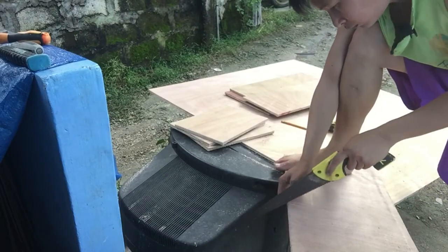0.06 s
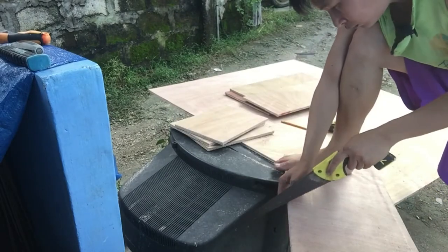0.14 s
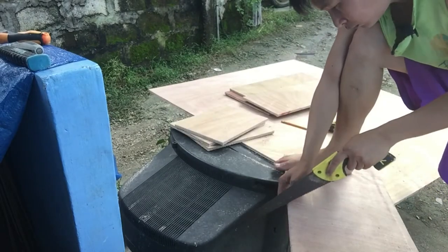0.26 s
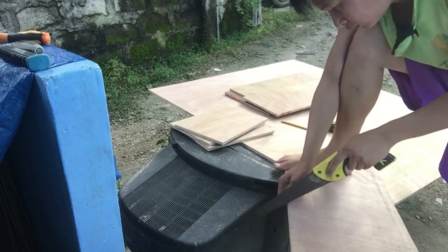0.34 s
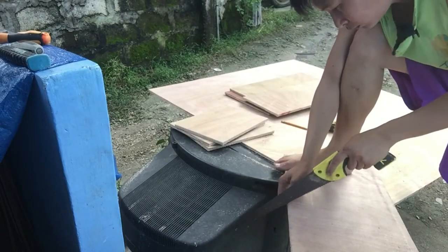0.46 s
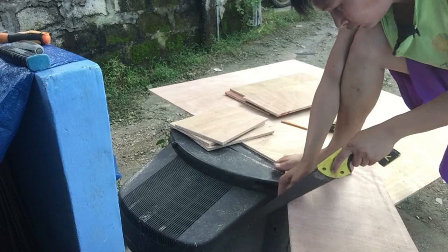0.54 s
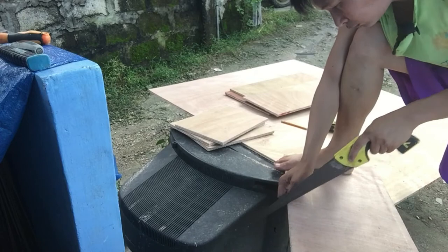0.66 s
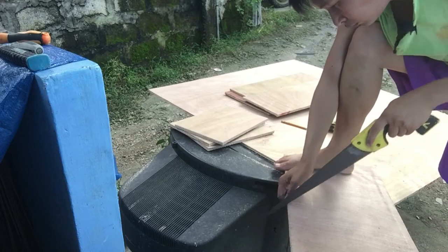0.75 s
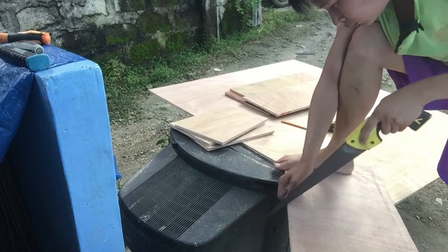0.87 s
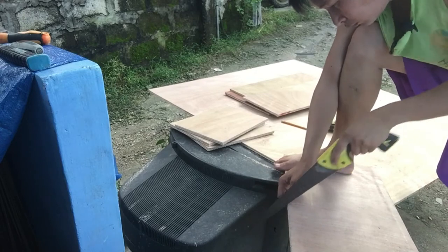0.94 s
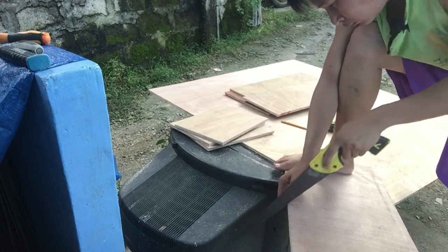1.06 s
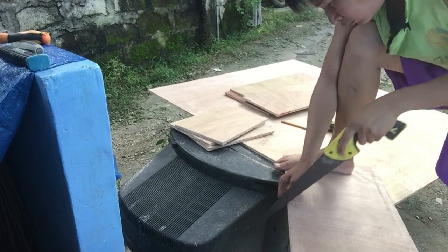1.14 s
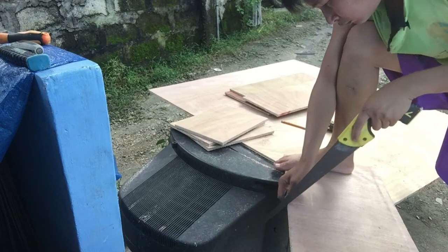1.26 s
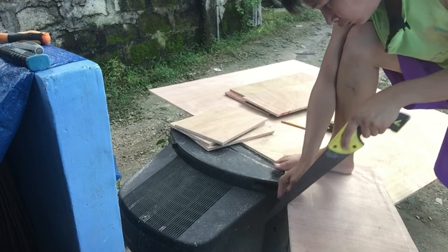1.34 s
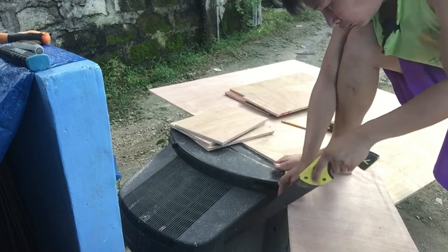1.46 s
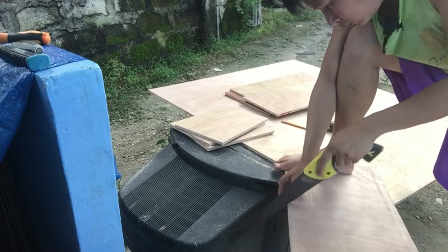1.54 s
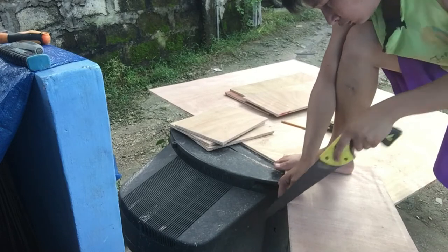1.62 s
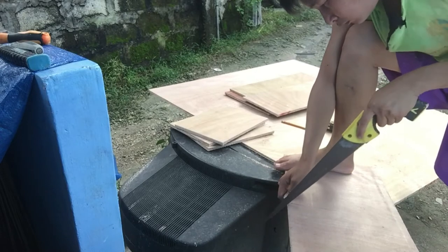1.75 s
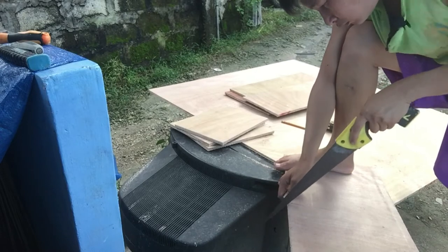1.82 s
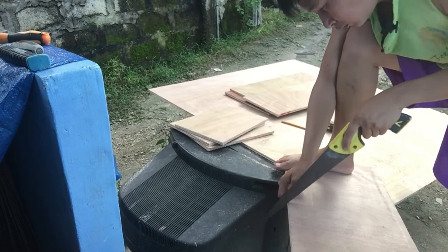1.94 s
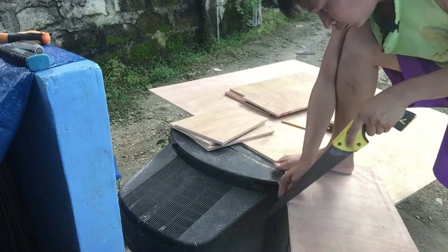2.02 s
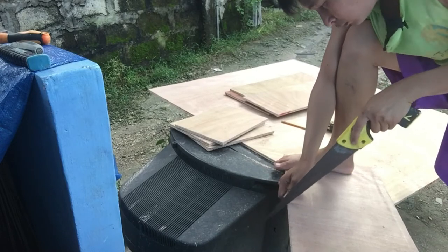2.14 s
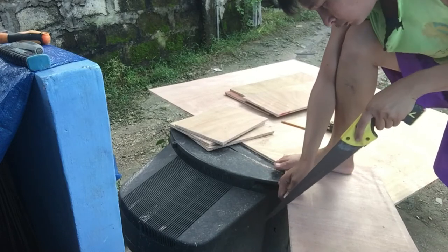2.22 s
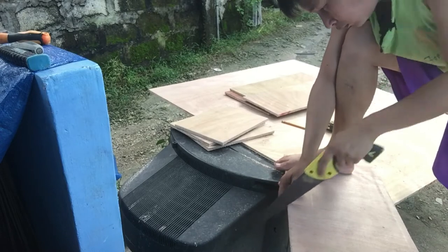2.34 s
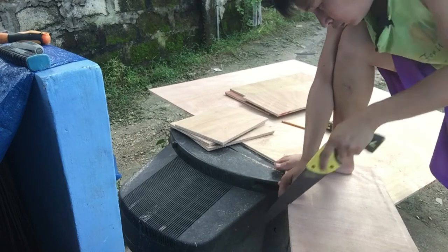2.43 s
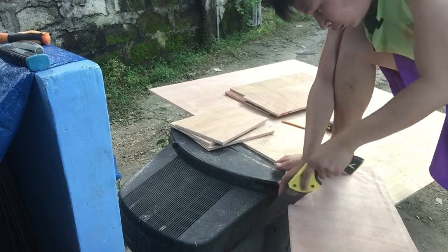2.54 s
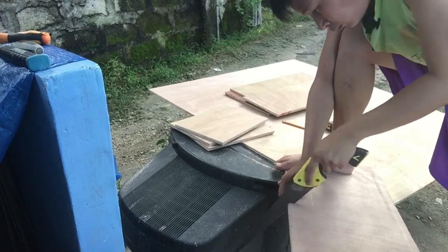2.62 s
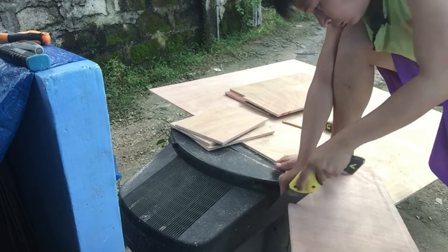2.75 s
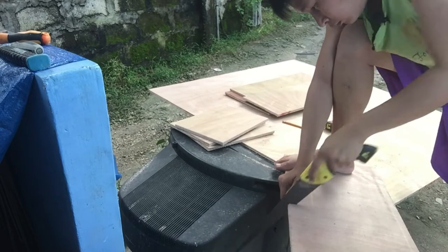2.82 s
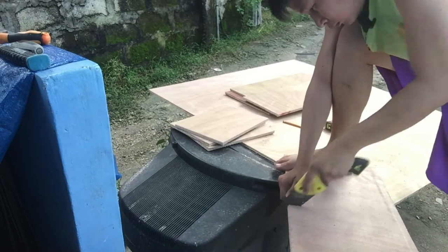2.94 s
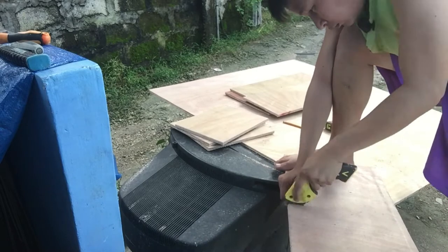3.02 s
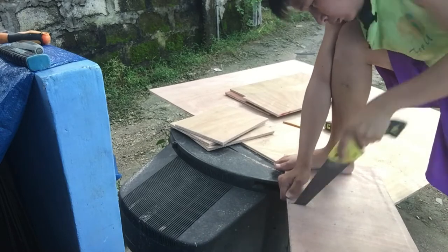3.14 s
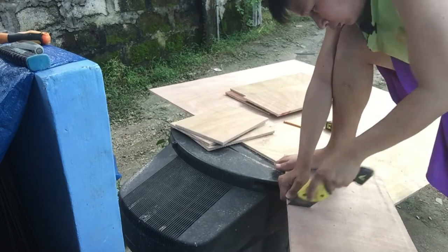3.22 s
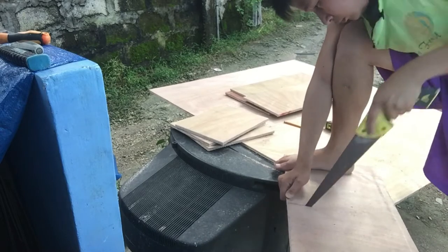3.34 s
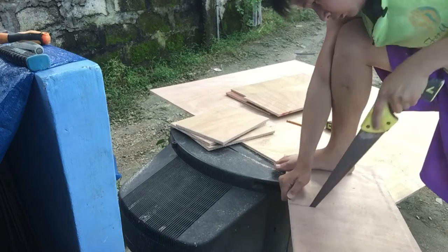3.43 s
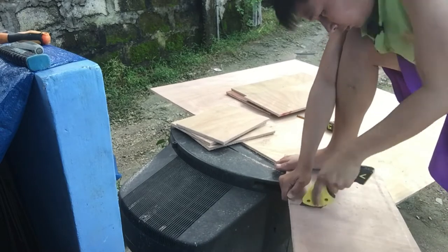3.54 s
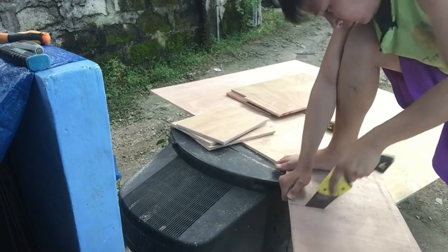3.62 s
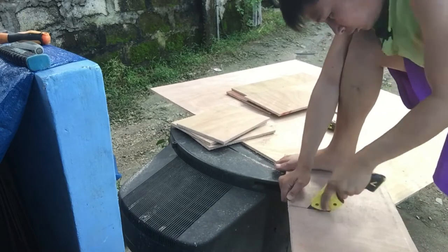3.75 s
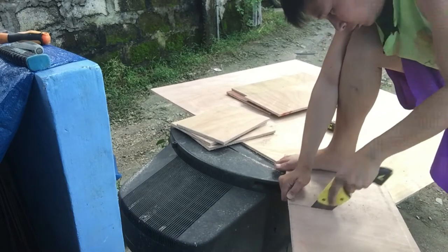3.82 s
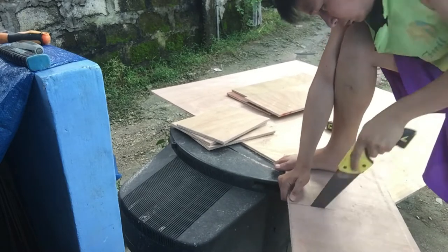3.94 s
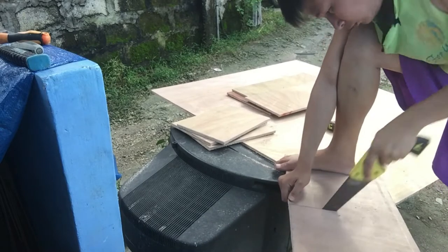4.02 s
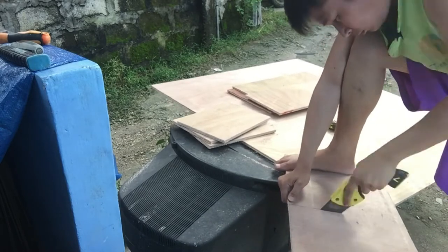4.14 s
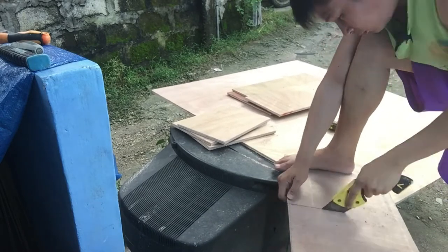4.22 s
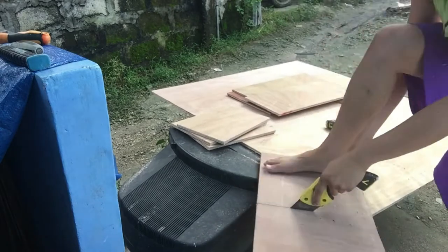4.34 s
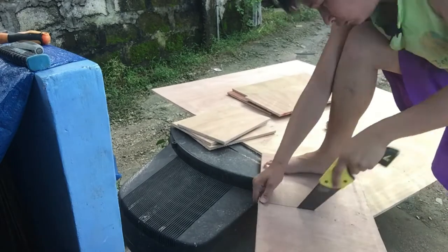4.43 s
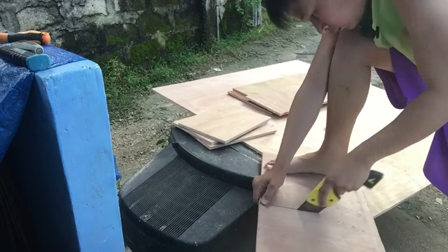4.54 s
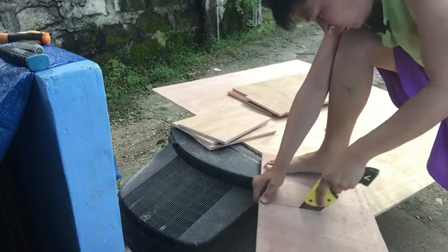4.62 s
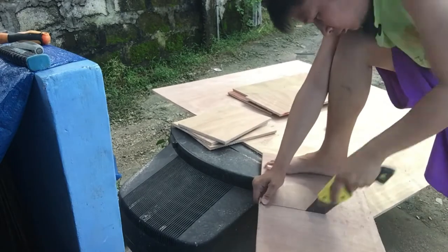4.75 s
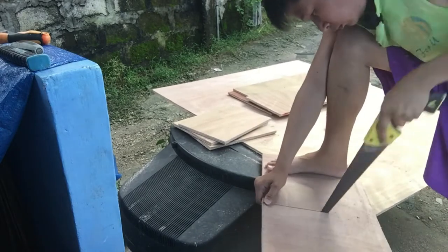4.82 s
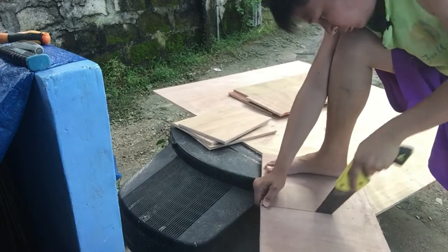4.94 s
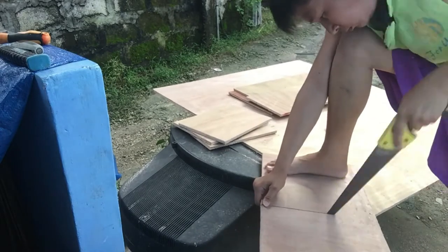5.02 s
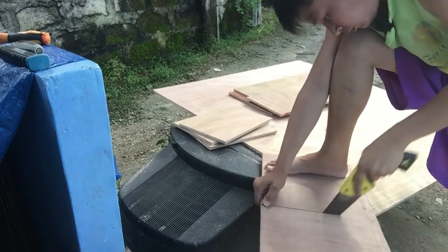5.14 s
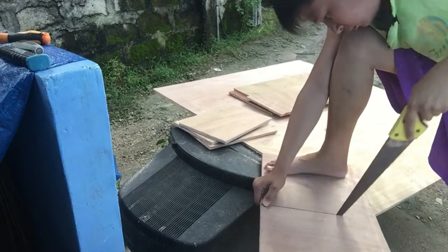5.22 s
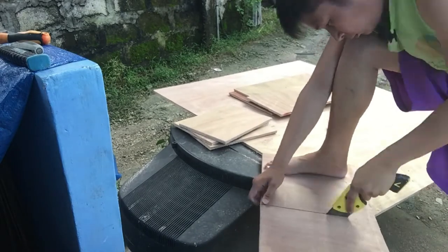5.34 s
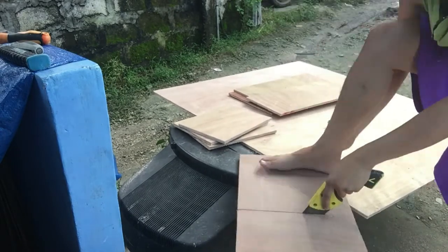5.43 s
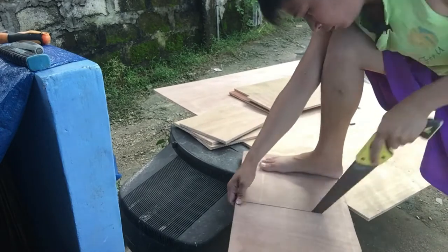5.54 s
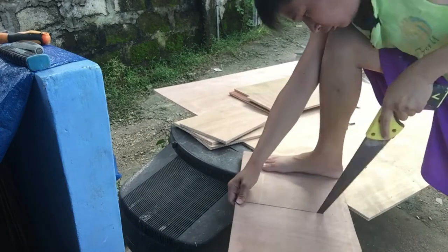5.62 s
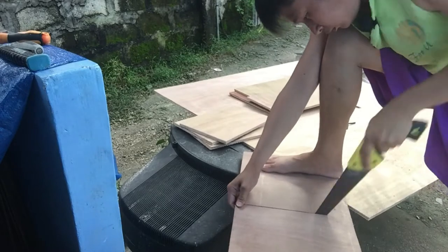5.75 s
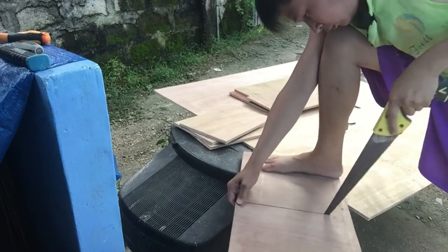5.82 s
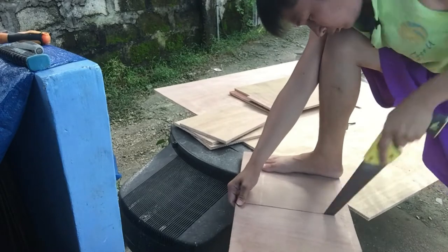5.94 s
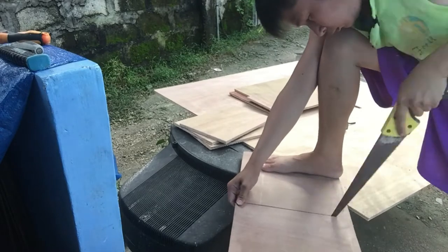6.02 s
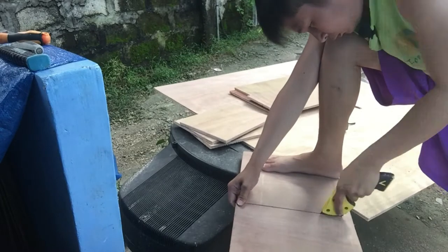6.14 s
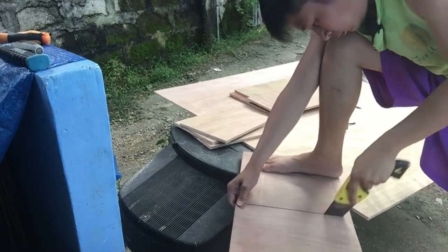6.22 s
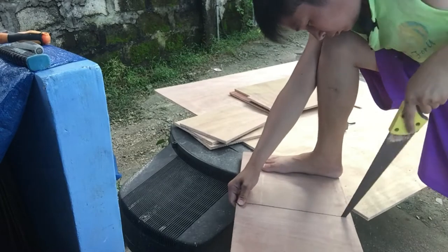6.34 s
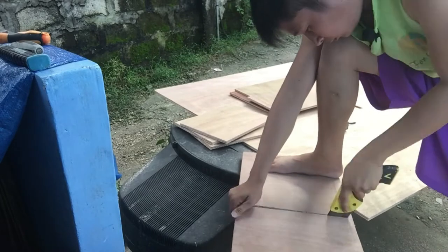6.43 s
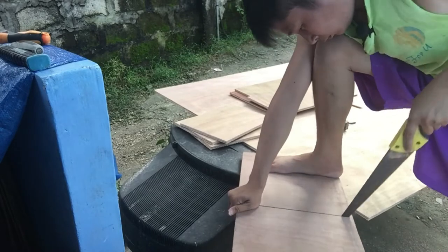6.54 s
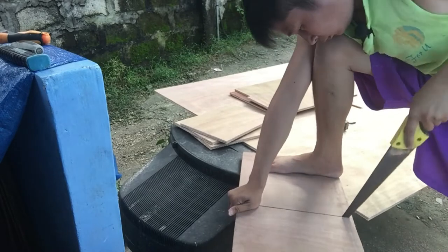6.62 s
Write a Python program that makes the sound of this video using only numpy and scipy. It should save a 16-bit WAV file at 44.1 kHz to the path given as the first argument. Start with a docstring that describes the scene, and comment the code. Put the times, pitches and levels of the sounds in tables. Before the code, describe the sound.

In a quiet yard, a blade lightly brushes thin plywood for two seconds, giving low hollow drones, soft rasps and dull bumps. Then unnaturally fast hand sawing breaks in, about fourteen harsh strokes a second, with early knocks from the loose panel. Short gaps interrupt it near the middle and end. Close microphone, about a metre away, with dry sound and only a faint dull echo.

```python
"""Slow, light saw strokes and dull bumps come first, making a thin plywood panel drone in a quiet yard.
Then comes sped-up playback of a hand saw, about fourteen strokes a second with short pauses, a metre away.
Each stroke is a grainy pull and a loud push: noise grains and tooth pulses ring through blade and panel,
whose resonances shift as the cut lengthens. Pushes may end in a knock, made of damped panel modes.
Around the saw lie squeaks, ticks, a flutter of the panel, low rumble, faint air noise and a dull echo."""
import sys
import numpy as np
from scipy import signal
from scipy.fft import rfft, irfft
from scipy.io import wavfile
from scipy.ndimage import uniform_filter1d, map_coordinates

SR = 44100
rng = np.random.default_rng(int(sys.argv[2]) if len(sys.argv) > 2 else 0)


def transcribe(signal):
    """Save signal, clipped to [-1, 1], as a 16-bit WAV file at the path in sys.argv[1]."""
    frames = np.atleast_2d(signal).T
    limited = np.clip(frames, -1, 1)
    pcm = np.round(limited * 32767).astype(np.int16)
    wavfile.write(sys.argv[1], SR, pcm)


N = 294491
TIME = np.arange(N) / SR  # s
TAPS = 4096  # length of the impulse responses, samples
FREQ = np.maximum(np.arange(TAPS // 2 + 1) * SR / TAPS, 1)  # Hz
TOP_HZ = 15850  # upper limit of the recorder

# Tone of the yard air. Each row: frequency in Hz, relative level in dB.
YARD_TONE = [(15, -44), (25, -10), (81, -21), (128, -12), (1180, -24.5), (2500, -37), (12400, -41.5),
             (15000, -42)]
# Loudness of the yard air, around which it wavers. Each row: time in seconds, level in dB.
YARD_LOUDNESS = [(0, -48.5), (.22, -57.5), (.4, -59.5), (2.3, -56.5), (6.68, -46)]
# Swells of low rumble, which waver. Each row: middle in seconds, length in seconds, level in dB.
RUMBLE_SWELLS = [(.84, 0.17, -34.5), (1.32, 0.074, -31.5), (1.8, 0.74, -39), (2.275, 0.039, -26.5),
                 (6.61, 0.044, -31)]
# Dull bumps of the panel under hand and foot. Each row: time in seconds, peak in dB before a common trim.
PANEL_BUMPS = [(0.647, -22), (0.725, -17.5), (1.145, -20), (1.192, -18), (1.663, -14), (1.688, -13.5),
               (1.87, -14.5), (2.123, -18), (2.148, -27), (3.954, -16), (4.423, -23), (4.83, -21.5),
               (4.918, -19), (5.519, -18.5), (6.585, -16), (6.603, -15.5), (6.625, -24)]
# Small sharp ticks. Each row: time in seconds, peak in dB before a common trim.
SHARP_TICKS = [(2.0761, -27.5), (4.2964, -22.5), (4.4383, -18), (5.5286, -19), (5.5486, -22), (6.572, -8)]
# Bending modes of the panel. Each row: frequency in Hz, width in Hz, relative level in dB.
BENDING_MODES = [(138, 69, -7.5), (223, 50, 3.5), (290, 16, 4), (418, 36, -2), (526, 90, -40)]
# Slow, light strokes and brushes of the blade. Each row: middle in seconds, length in seconds,
# panel drone in dB and rasp in dB, both before a common trim.
LIGHT_STROKES = [(0.713, 0.25, -33, -43.5), (1.006, 0.14, -21.5, -34.5), (1.223, 0.17, -32.5, -46),
                 (1.478, 0.15, -23, -32.5), (1.703, 0.13, -28, -39.5), (1.899, 0.12, -27, -40.5),
                 (2.155, 0.71, -44.5, -58.5), (3.966, 0.024, -35, -32), (4.34, 0.049, -71, -49),
                 (5.46, 0.018, -67, -36), (5.525, 0.036, -63, -44), (6.608, 0.08, -29, -43.5)]
# Tone of the light rasp. Each row: frequency in Hz, relative level in dB.
RASP_TONE = [(620, 5.5), (820, 9), (950, 6), (1080, -1), (1370, 3), (1560, -6.5), (2050, 0.5), (2800, -6),
             (4000, -3), (5000, -7), (7000, -10.5), (10000, -14.5), (15000, -32)]
# Thin squeaks of the blade in the kerf. Each row: start in seconds, length in seconds,
# centre pitch in Hz, peak in dB.
BLADE_SQUEAKS = [(5.652, 0.024, 8700, -31), (5.686, 0.047, 8400, -32), (5.754, 0.061, 13800, -31)]
# Looseness of the panel, greatest while the cut is near its free edge. Each row: time in seconds,
# level of its knocks in dB before stroke strength and trim.
PANEL_LOOSENESS = [(2.48, -24), (2.58, -9), (2.66, -10), (2.77, 4), (3.12, 0), (3.19, -11), (3.57, -12),
                   (4.24, -17), (4.58, -31), (6.55, -26)]
# The blade catches on a pull and shakes the panel. Each row: middle in seconds, length in seconds, level in dB.
BLADE_CATCHES = [(2.421, .008, -24), (2.745, 0.014, -25.5), (3.447, 0.034, -24.5), (3.545, 0.024, -25),
                 (4.83, 0.031, -35.5)]
# Modes of the panel jolted at the end of a push. Each row: frequency in Hz before a random detuning,
# width in Hz, relative level in dB.
JOLT_MODES = [(152.5, 120, -4.5), (400, 190, 0), (517, 155, -1.5), (1000, 670, 1), (1450, 334, -6)]
# Strokes of the sped-up sawing. Each row: peak of the push in seconds, strength in dB.
SPED_UP_STROKES = [(2.379, -6.5), (2.439, -4), (2.505, -3.5), (2.578, -2.5), (2.652, -2), (2.765, -0.5),
                   (2.838, 0), (2.911, -0.5), (2.982, 1), (3.0516, 2), (3.1215, 2.5), (3.190, -1),
                   (3.260, -0.5), (3.3296, -1), (3.398, .5), (3.496, -1), (3.570, 2), (3.641, -0.5),
                   (3.710, 0), (3.777, -1), (3.845, -0.5), (3.915, 0), (4.038, .5), (4.108, 2),
                   (4.174, 1.5), (4.2437, 1), (4.512, -1.5), (4.581, 0.5), (4.650, 1.5), (4.7178, 1),
                   (4.786, 0.5), (4.878, 1), (4.961, .5), (5.029, -0.5), (5.097, -.5), (5.164, 0),
                   (5.231, 0), (5.299, -2), (5.365, -.5), (5.624, -4.5), (5.691, -3), (5.757, -1.5),
                   (5.822, .5), (5.889, 2), (5.956, 1), (6.023, -0.5), (6.090, -0.5), (6.173, -0.5),
                   (6.247, -.5), (6.324, 0), (6.413, -1), (6.549, -3)]
# Progress of the cut. Each row: time in seconds, stage (0 early, 1 midway, 2 late).
CUT_PROGRESS = [(3.1, 0.035), (3.6, 0.33), (3.8, 0.76), (4.1, 1), (5.35, 1.05), (5.65, 1.58), (5.9, 1.94)]
# How loudly the teeth cut, one row for each stage. Each row: scrape in dB, bite in dB.
STAGE_LEVELS = [(-16.5, -19.5), (-19, -13.5), (-16, -19)]
# Outline of the tone of blade and panel at each stage. Each row: frequency in Hz, relative level in dB.
EARLY_OUTLINE = [(300, -12), (700, -7), (950, -5.5), (1400, -7.5), (1900, 4), (2300, -2.2), (2900, -11.5),
                 (3500, -6), (4200, -19), (5000, -17), (5700, -15), (6800, -19), (9000, -15),
                 (15000, -15.5)]
MIDWAY_OUTLINE = [(300, -27), (700, -14.5), (950, -4.5), (1400, -7.5), (1900, -16), (2300, -10.5),
                  (2900, -8), (3500, -0.2), (4200, -0.5), (5000, -4), (5700, -13), (6800, -13), (9000, -15),
                  (15000, -17.5)]
LATE_OUTLINE = [(300, -20.5), (700, -20), (950, -4), (1400, 2), (1900, -2.5), (2300, -7), (2900, -10.5),
                (3500, -5.5), (4200, -9.5), (5000, -7), (5700, -16.5), (6800, -15), (9000, -15.5),
                (15000, -12)]
# Resonances standing out of each outline. Each row: frequency in Hz, width in Hz, lift in dB.
EARLY_RESONANCES = [(1870, 160, 3), (2420, 260, 6), (3020, 450, 9.5), (3500, 340, 3), (4520, 150, 9.5),
                    (4570, 220, 7), (6193, 140, 15), (6770, 330, 8.5), (7380, 160, 12.5)]
MIDWAY_RESONANCES = [(1409, 131, 6.9), (1920, 110, 3.1), (2416, 386, 15.4), (2950, 270, 1),
                     (4220, 600, 2.3), (4898, 310, 1.7), (5610, 230, 4.2), (5900, 220, 3.8),
                     (6970, 440, 9.7)]
LATE_RESONANCES = [(970, 160, 1.47), (1259, 83.5, 3.6), (1924, 330, 6.2), (2322, 274, 7.9),
                   (3138, 200, 2.5), (4200, 140, 1.4), (4391, 192, 4), (6400, 390, 11.7), (8000, 55.4, 5.5)]

# All stroke times below are as heard, sped up.
# On a push the teeth engage this long before its peak, and take this long to grip.
PUSH_S, GRIP_S = 0.0205, 0.0044
# A pull starts this long after a peak, and at most this long before the next; then the first pull's start.
TURN_S, LONGEST_PULL_S, FIRST_PULL_S = 0.011, 0.068, 2.338
# The steady beat of the strokes; one that is LATE_S or more behind it starts fully from rest.
BEAT_S, LATE_S = 0.07, 0.03
# From rest, the push is longer (share), the pull softer and the knock softer (dB).
REST_STRETCH, REST_PULL_DB, REST_KNOCK_DB = 0.12, -6, -7


def undb(db):
    """Decibels to gain."""
    return 10 ** (np.asarray(db) / 20)


def rms(x):
    """Root mean square."""
    return np.sqrt(np.mean(x ** 2))


def ramp(x):
    """Clip to 0..1, so that a rising value climbs to 1 and stays there."""
    return np.clip(x, 0, 1)


def curve(rows):
    """Second column of a table over time, joined by straight lines."""
    times, values = np.transpose(rows)
    return np.interp(TIME, times, values)


def walk(rate):
    """Random wander with this many corner points a second, spread near 1."""
    corners = rng.standard_normal(N // 10)
    return 1.2 * np.interp(TIME * rate, np.arange(N // 10), corners)


def swells(rows, fade_db):
    """Level of gestures (middle s, length s, dB) that swell and fade; each is fade_db down at its ends."""
    level = np.zeros(N)
    for middle, length, db in rows:
        near = np.abs(TIME - middle) < 2 * length
        position = 2 * (TIME[near] - middle) / length
        level[near] += undb(db - fade_db * position ** 2)
    return level


def colour(points, peaks=()):
    """Gain over frequency: an outline (Hz, dB) with resonances (Hz, width Hz, dB) standing out of it."""
    hz, db = np.transpose(points)
    outline = np.interp(np.log(FREQ), np.log(hz), db)
    lifts = sum(lift / (1 + (2 * (FREQ - f) / width) ** 2) for f, width, lift in peaks)
    return undb(outline + lifts)


def modes(rows):
    """Gain over frequency of a set of damped modes (Hz, width Hz, dB), summed in power."""
    power = 0
    for f, width, db in rows:
        detuning = (FREQ ** 2 - f ** 2) / (FREQ * width)
        power = power + undb(2 * db) / (1 + detuning ** 2)
    return np.sqrt(power)


def below(hz, order=4):
    """Gain of a low-pass."""
    return 1 / np.sqrt(1 + (FREQ / hz) ** (2 * order))


def above(hz, order=4):
    """Gain of a high-pass."""
    return 1 / np.sqrt(1 + (hz / FREQ) ** (2 * order))


def response(gain):
    """Causal, minimum-phase impulse response with this gain, made by folding its cepstrum."""
    cepstrum = irfft(np.log(gain + gain.max() * 1e-5))
    cepstrum[1:TAPS // 2] *= 2
    cepstrum[TAPS // 2 + 1:] = 0
    return irfft(np.exp(rfft(cepstrum)))


def ring(force, gain):
    """Play a force through a body; white noise keeps its level."""
    return signal.oaconvolve(force, response(gain / rms(gain)))[:N]


def decaying_noise(t, t60):
    """Noise of unit energy that falls by 60 dB in t60 seconds."""
    tail = rng.standard_normal(len(t)) * undb(-60 * t / t60)
    return tail / np.linalg.norm(tail)


def ring_on(sound, t60=0.042, ring_db=-11):
    """The crowd of weak modes in blade and panel rings on as a short noise tail (t60 in s)."""
    tail = decaying_noise(TIME[:2 * TAPS], t60)
    ringing = signal.oaconvolve(sound, tail)[:N]
    return (sound + undb(ring_db) * ringing) / np.hypot(1, undb(ring_db))


def add(out, s, sound, db):
    """Mix in a short sound at time s with the given peak level."""
    start = int(s * SR)
    part = out[start:start + len(sound)]
    scaled = undb(db) * sound / np.abs(sound).max()
    part += scaled[:len(part)]


def grains(rate, spread_db, smooth):
    """Fibres snap at random (rate a second), in uneven sizes, over smooth friction noise; rms 1."""
    happens = rng.random(N) < rate / SR
    size = undb(spread_db * np.clip(rng.standard_normal(N), -2, 2))
    snaps = happens * rng.choice([-1, 1], N) * size
    force = snaps / rms(snaps) + smooth * rng.standard_normal(N)
    return force / rms(force)


def yard(waver_db=4):
    """Faint outdoor noise, with an uneven low rumble before and after the sped-up strokes."""
    air = ring(rng.standard_normal(N), colour(YARD_TONE))
    air = air * undb(curve(YARD_LOUDNESS) + walk(26))
    rumble_tone = colour([(12, 1), (30, 2.5), (80, 3.5), (140, -5.0), (400, -20), (1500, -83)])
    rumble = ring(rng.standard_normal(N), rumble_tone)
    swell = swells(RUMBLE_SWELLS, fade_db=5.5) * undb(waver_db * np.tanh(walk(22)))
    return air + swell * rumble


def walls(sound, t60=0.26, echo_db=-26):
    """The walls of the yard return a faint, dull echo: low-passed, decaying noise (t60 in s)."""
    tail = decaying_noise(TIME[:SR // 3], t60)
    echo = signal.oaconvolve(sound, tail)[:N]
    return sound + undb(echo_db) * ring(echo, below(9600, order=1))


def small_hits(bump_trim_db=-1, tick_trim_db=-2):
    """Soft bumps ring the panel's low modes; ticks are dry clicks with a falling treble."""
    out = np.zeros(N)
    # a bump also rocks the whole panel on its support
    panel = modes(list(BENDING_MODES) + [(130, 40, 0.5)])
    bump = response(panel * below(496, order=3))
    for s, db in PANEL_BUMPS:
        add(out, s + 0.0019, bump, db + bump_trim_db)
    tick = response(colour([(200, 7), (1700, 1.0), (14000, -23.0)]))
    for s, db in SHARP_TICKS:
        add(out, s + 0.00126, tick, db + tick_trim_db)
    return out


def rubbing(drone_trim_db=-1, rasp_trim_db=0):
    """Strokes with little pressure swell and fade: the panel drones in its bending modes under a soft rasp."""
    s, length, drone_db, rasp_db = np.transpose(LIGHT_STROKES)
    drone_level = swells(zip(s, length, drone_db + drone_trim_db), fade_db=8)
    rasp_level = swells(zip(s, length, rasp_db + rasp_trim_db), fade_db=9.5)
    friction = grains(rate=2500, spread_db=0.5, smooth=0.89) * undb(2.85 * walk(150))
    bending = modes(BENDING_MODES) * below(456, order=3) * above(117, order=2)
    drone = ring(friction * drone_level, bending)
    scratches = grains(rate=1400, spread_db=6.5, smooth=0.82) * undb(2 * walk(120))
    rasp = ring(scratches * rasp_level, colour(RASP_TONE) * above(510, order=2))
    return drone + ring_on(rasp, t60=0.27, ring_db=-4.5)


def squeaks():
    """The blade sings briefly where the kerf pinches it: sine tones with a trembling pitch."""
    out = np.zeros(N)
    for s, length, hz, db in BLADE_SQUEAKS:
        count = int(length * SR)
        pitch = hz * (1 + 0.011 * walk(920)[:count])
        tone = np.sin(2 * np.pi * np.cumsum(pitch) / SR)
        add(out, s, np.hanning(count) * tone, db)
    return out


def fluttering(moving, flutter_db=-35, follows=0.21):
    """Sparse grains shake the panel while the blade moves: more when it is loose, or when the blade catches."""
    shake = undb(flutter_db + follows * curve(PANEL_LOOSENESS)) + swells(BLADE_CATCHES, fade_db=7.5)
    motion = uniform_filter1d(1.0 * moving, size=900)  # eased over about 20 ms
    flutter = grains(rate=150, spread_db=2.5, smooth=0.28) * motion * shake
    tone = colour([(35, -23.5), (130, -1.5), (350, -3.5), (700, -10.5), (2500, -20.5), (8000, -78)])
    return ring(flutter, tone)


def from_rest():
    """For each stroke: 0 if it keeps the beat, up to 1 if a pause comes before it."""
    gaps = np.diff(np.array(SPED_UP_STROKES)[:, 0], prepend=0)
    return ramp((gaps - BEAT_S) / LATE_S)


def knocks(knock_trim_db=1, contact_hz=950, hardening=0.075, bounce_s=0.00499, bounce_db=-11, bounce_hz=450):
    """A push ends by jolting the panel, which bounces once; a harder jolt is shorter and so brighter."""
    out = np.zeros(N)
    times, strength_db = np.transpose(SPED_UP_STROKES)
    loose_db = np.interp(times, *np.transpose(PANEL_LOOSENESS))
    jolts = loose_db + strength_db + REST_KNOCK_DB * from_rest()
    for s, db in zip(times, jolts):
        detuned = [(f * np.exp(rng.uniform(-0.4, 0.38)), width, mode_db) for f, width, mode_db in JOLT_MODES]
        body = modes(detuned) * above(114, order=2)
        # contact_hz is the cutoff of a 4.5 dB jolt
        contact = below(contact_hz * np.exp(hardening * (db - 4.5)), order=2)
        add(out, s + 0.00047, response(body * contact), db + knock_trim_db)
        delay = bounce_s * (0.5 + rng.random())
        add(out, s + delay, response(body * below(bounce_hz, order=2)), db + bounce_db)
    return out


def stroke_cycle(pull_attack=0.26, pull_hold=0.39, pull_fade_db=18):
    """The sped-up cycle: time from the push's peak (s), push strength, and a pull that sets in and fades."""
    peaks, strength_db = np.transpose(SPED_UP_STROKES)
    turns = peaks[:-1] + TURN_S
    stroke = np.searchsorted(turns, TIME)  # index of the current stroke
    rest = from_rest()
    stretch = 1 + REST_STRETCH * rest
    start = np.maximum(np.r_[FIRST_PULL_S, turns], peaks - LONGEST_PULL_S)
    pull_length = peaks - PUSH_S * stretch - start
    share = (TIME - start[stroke]) / pull_length[stroke]
    pull_db = REST_PULL_DB * rest[stroke] - pull_fade_db * ramp(share - pull_hold)
    pull = ramp(share / pull_attack) * (share < 1) * undb(pull_db)
    age = (TIME - peaks[stroke]) / stretch[stroke]  # longer pushes run slower
    return age, undb(strength_db)[stroke], pull


def push(age, rise_db_per_s, hold_s, stop_s):
    """Level of a push: teeth grip, pressure builds, holds until the peak, then the blade stops."""
    grip = ramp((age + PUSH_S) / GRIP_S)
    pressure = undb(rise_db_per_s * np.minimum(age + hold_s, 0))
    return grip * pressure * ramp(1 - age / stop_s)


def teeth(rate):
    """One pulse for each tooth that crosses the kerf, each with its own depth of cut; rms 1."""
    passed = np.cumsum(rate / SR)
    depths = undb(7.8 * np.clip(rng.standard_normal(N), -2, 1))
    crossing = np.diff(np.floor(passed), prepend=0)
    pulses = crossing * depths[passed.astype(int)] / np.sqrt(rate)
    return pulses / rms(pulses)


def flex(sound, drift_s=0.000507, rate=22):
    """The blade bends at random, heard as a wandering delay that shifts the resonances a little."""
    return map_coordinates(sound, [(TIME + drift_s * walk(rate)) * SR], mode="nearest")


def sawing(tooth_hz=4150, split_hz=2900, hiss_hz=6500, hiss_db=-3.5, pull_db=-28, pull_follows=0.26,
           slowing=0.45):
    """Teeth tear fibres on the push and skip over them on the pull, sped up; blade and panel ring with both."""
    age, strength, pull = stroke_cycle()
    # the blade is fastest at the peak of the push, where the tooth rate wanders around tooth_hz
    speed = (1 - ramp(slowing) * ramp((age / PUSH_S) ** 2)) * (1 + 0.03 * walk(150))
    tooth_rate = tooth_hz * speed * np.exp(0.06 * walk(1500))
    tearing = 0.5 * teeth(tooth_rate) + 0.91 * grains(rate=7000, spread_db=4, smooth=0.75)
    cut = tearing * undb(0.97 * walk(350)) * strength
    skip = grains(rate=1100, spread_db=5.0, smooth=0.73) * undb(2.77 * walk(220))
    # three bands of the push: low scrape, treble bite, top hiss
    scraping = cut * push(age, rise_db_per_s=600, hold_s=0.002, stop_s=0.0099)
    biting = cut * push(age, rise_db_per_s=1262, hold_s=0.00017, stop_s=0.0071)
    hissing = cut * push(age, rise_db_per_s=1650, hold_s=0.0035, stop_s=0.011)
    pulling = skip * pull * undb(pull_db) * strength ** pull_follows
    pull_tone = colour([(900, 1.3), (2400, -0.24), (4500, -2.2)])
    treble_forces = [(biting, below(hiss_hz, order=6)), (undb(hiss_db) * hissing, above(hiss_hz, order=6))]

    out = np.zeros(N)
    progress = curve(CUT_PROGRESS)
    stages = [(EARLY_OUTLINE, EARLY_RESONANCES), (MIDWAY_OUTLINE, MIDWAY_RESONANCES),
              (LATE_OUTLINE, LATE_RESONANCES)]
    for stage, (outline, resonances) in enumerate(stages):
        scrape_db, bite_db = STAGE_LEVELS[stage]
        # neighbouring stages crossfade at equal power
        weight = np.sqrt(np.clip(1 - np.abs(progress - stage), 0, 1))
        body = colour(outline, resonances) * above(280, order=2)
        treble = body * above(split_hz, order=8)
        sound = undb(scrape_db) * ring(weight * scraping, body * below(split_hz, order=8))
        for force, band in treble_forces:
            band_share = rms(treble * band) / rms(treble)  # undoes the levelling in ring()
            sound += undb(bite_db) * ring(weight * force, treble * band) * band_share
        sound += ring(weight * pulling, body * pull_tone)
        out += ring_on(sound)
    moving = np.abs(pulling) + np.abs(biting) > 0
    return flex(out) + fluttering(moving)


def scene():
    """Yard, panel and saw, heard from about a metre away; only sped-up sawing and knocks get the echo."""
    saw = walls(sawing() + knocks())
    return (yard() + small_hits() + rubbing() + squeaks() + saw)[None]


def record(dry):
    """The recorder clips at full scale, then cuts everything above TOP_HZ steeply."""
    top_cut = signal.ellip(10, 0.2, 70, TOP_HZ, fs=SR, output="sos")
    return signal.sosfilt(top_cut, np.clip(dry, -1, 1))


dry = scene()
out = record(dry)
transcribe(out)
```